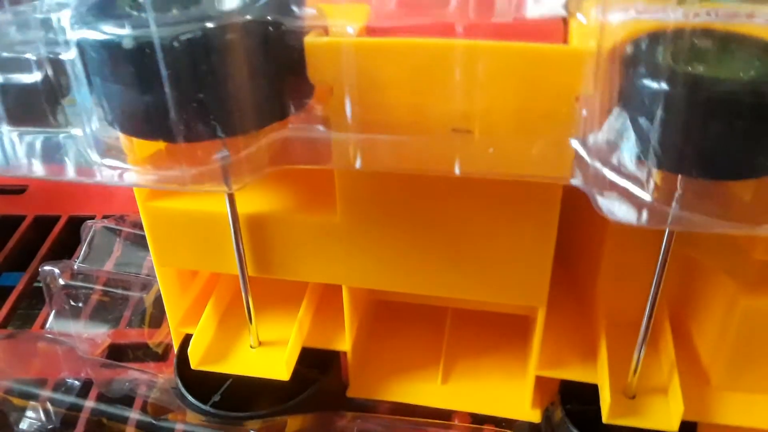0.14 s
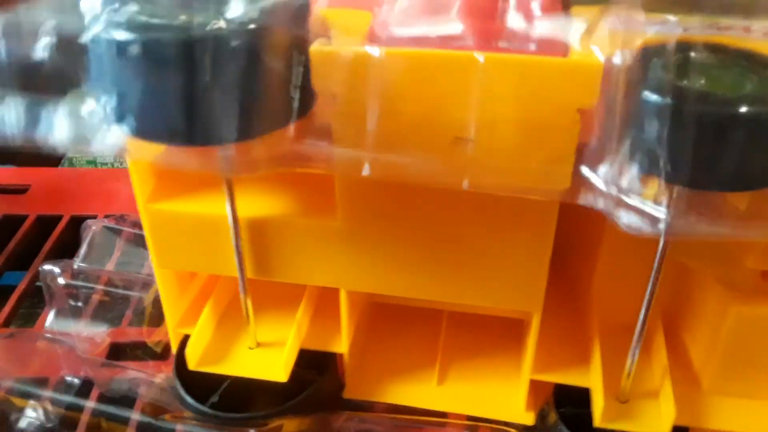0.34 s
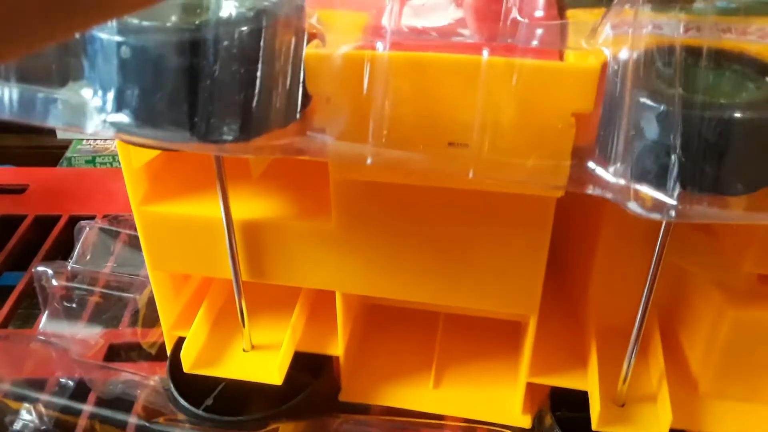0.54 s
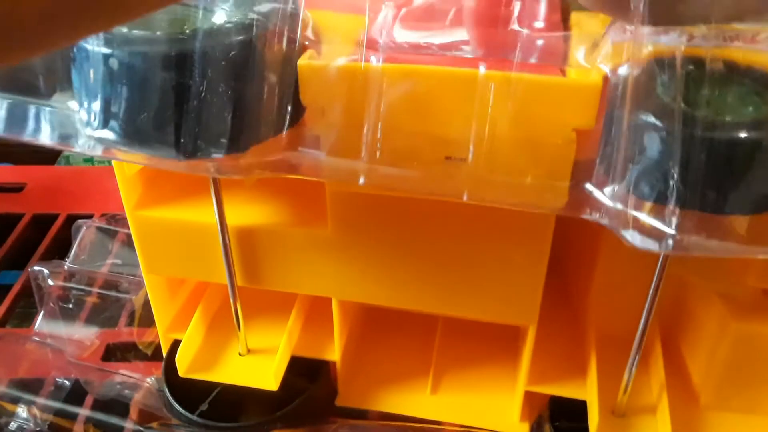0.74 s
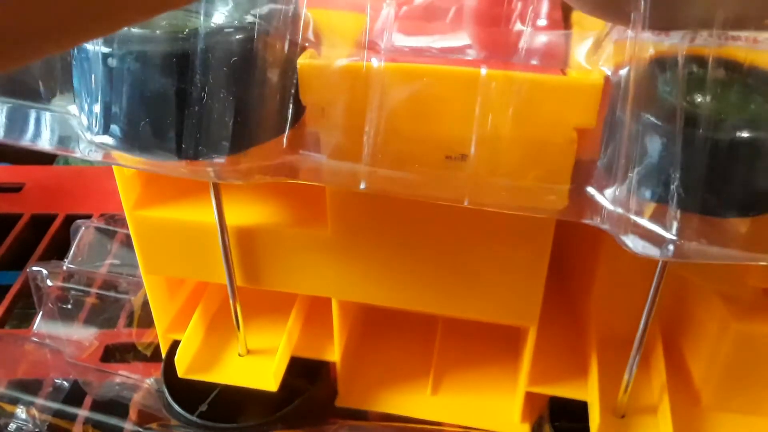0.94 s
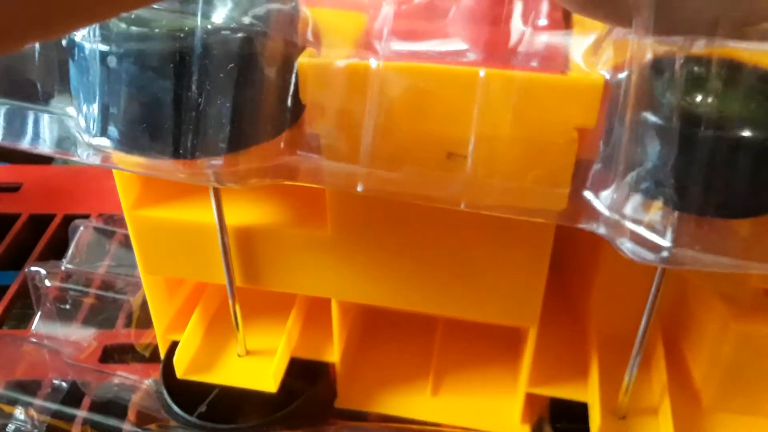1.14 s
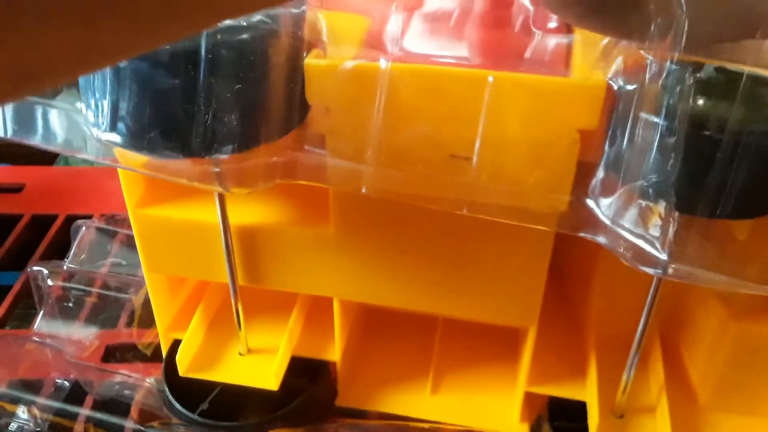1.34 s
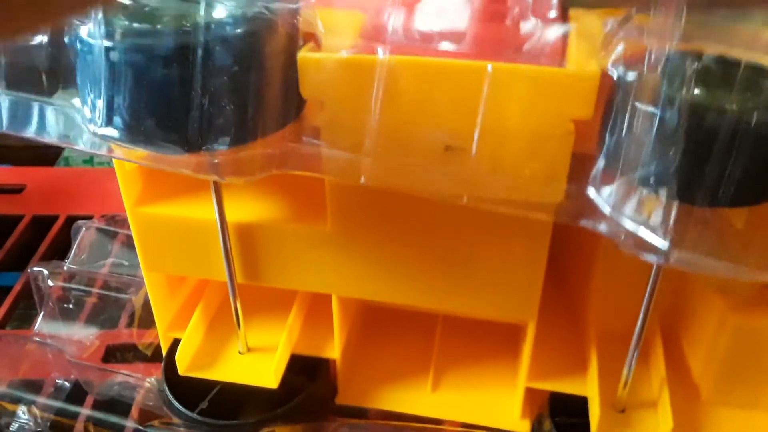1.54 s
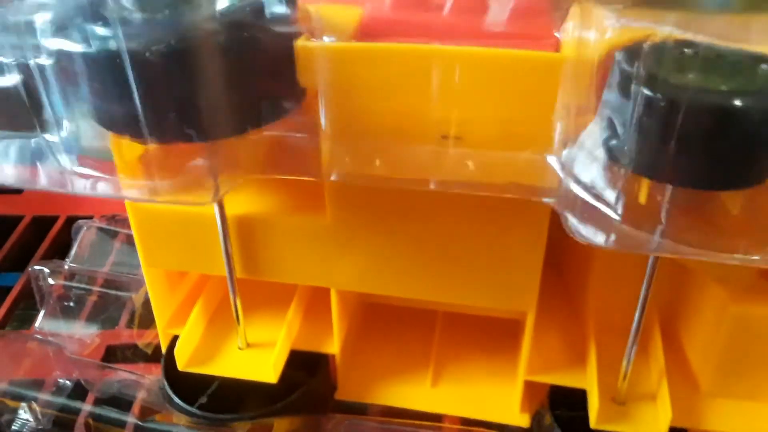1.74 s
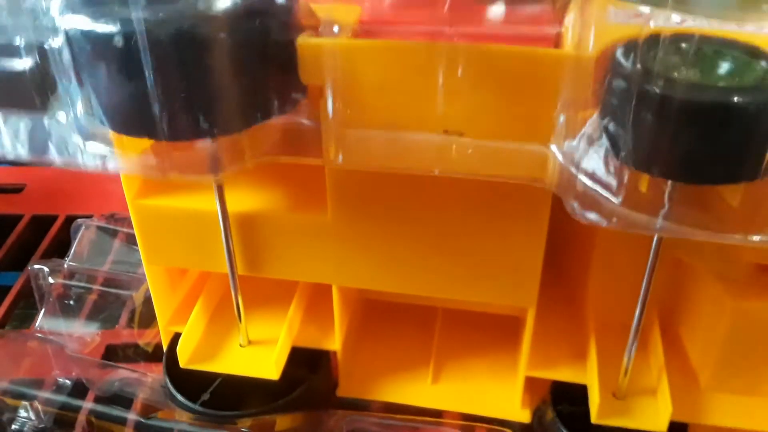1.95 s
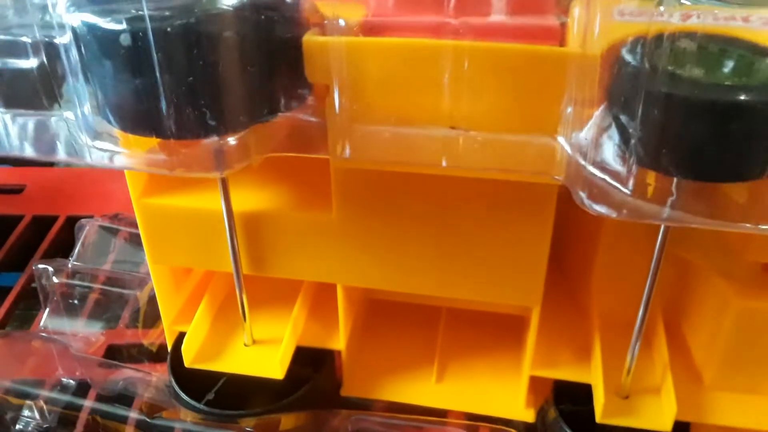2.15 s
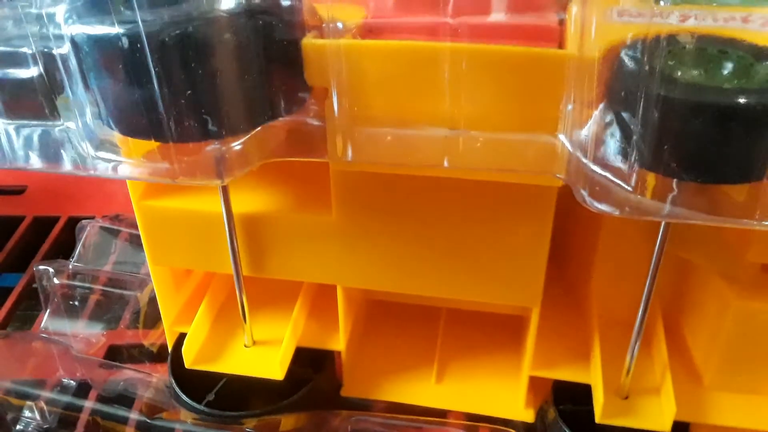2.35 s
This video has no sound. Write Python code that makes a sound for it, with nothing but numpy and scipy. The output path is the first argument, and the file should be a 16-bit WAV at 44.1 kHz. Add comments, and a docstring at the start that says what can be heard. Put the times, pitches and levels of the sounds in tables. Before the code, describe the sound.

Stiff plastic blister shell buckles with sharp clicks and crinkles, rubbing softly against a hard toy.

```python
"""A thin clear plastic blister buckles in bursts as it is pressed over a toy, close to two microphones in a small room.
Each snap sums a band-limited noise crack, a short facet ring, a lower shell ring and a low shake of the toy.
Tiny creases follow it, and noise tails return it from the nearby surroundings and the room.
Softer knocks use the same voices; rubbing is shaped noise plus a dense stream of stick-slip ticks.
Three low puffs of air, enveloped sines, push mostly at the right microphone."""
import sys
import numpy as np
from scipy import signal
from scipy.fft import rfft, irfft, next_fast_len
from scipy.io import wavfile

SR = 44100
rng = np.random.default_rng(int(sys.argv[2]) if len(sys.argv) > 2 else 0)


def transcribe(u):
    """Save the signal u as a 16-bit wav file named by the first command-line argument.

    u: samples, shape (n,) or (channels, n), limited to [-1, 1]; the rate is SR.
    q: integer samples, one column per channel.
    """
    v = np.clip(np.atleast_2d(u).T, -1, 1)
    q = np.round(v * 32767).astype(np.int16)
    wavfile.write(sys.argv[1], SR, q)


N = 105840  # length [samples]


def amp(db):
    """Decibels to gain."""
    return 10 ** (np.asarray(db) / 20)


def unit(x):
    """Scale to rms 1."""
    return x / np.sqrt(np.mean(x ** 2) + 1e-20)


def blow(x):
    """Scale a short sound to the energy of rms 1 held for 10 ms, averaged over its rows."""
    blow_s = 0.01
    energy = np.sum(x ** 2, axis=-1).mean()
    return x * np.sqrt(blow_s * SR / (energy + 1e-20))


def along(points, hz):
    """Interpolate (frequency [Hz], value) points on a log frequency axis."""
    f, v = np.transpose(points)
    return np.interp(np.log(hz + 1), np.log(f + 1), v)


def add(track, s, sound):
    """Mix a sound into the track at time s."""
    i = max(0, round(s * SR))
    track[:, i:i + sound.shape[1]] += sound[:, :N - i]


def filtered(x, response):
    """Multiply the spectrum of x by a response of frequency."""
    m = next_fast_len(N + 8192)
    hz = np.fft.rfftfreq(m, 1 / SR)
    return irfft(rfft(x, m) * response(hz), m)[..., :N]


def coloured(x, points, size=2048):
    """Minimum-phase filter with the gain of (frequency [Hz], level [dB]) points, by folding the cepstrum."""
    gain = amp(along(points, np.fft.rfftfreq(size, 1 / SR)))
    cepstrum = irfft(np.log(gain))
    cepstrum[1:size // 2] *= 2
    cepstrum[size // 2 + 1:] = 0
    impulse = irfft(np.exp(rfft(cepstrum)))
    return signal.fftconvolve(x, impulse[None], axes=1)[:, :N]


def pair(count, alike):
    """Left and right noise; alike is the shared part of the power."""
    noise = rng.standard_normal((3, count))
    return np.sqrt(alike) * noise[0] + np.sqrt(1 - alike) * noise[1:]


def left_later(x, lag_s):
    """Delay the left side by whole samples: the source sits to the right."""
    i = np.arange(x.shape[1])
    left = np.interp(i - round(lag_s * SR), i, x[0], left=0)
    return np.array([left, x[1]])


def snaps():
    """Snaps and knocks arrive directly, set off small creases, and scatter back from the surroundings."""
    # Facets giving way, levels as in blow(), before the overall colour:
    # (time [s], facet ring time [s], shell pitch [Hz], shell level [dB],
    #  facet pitch [Hz], facet level [dB], crack level [dB])
    snap_events = [(0.1431, 0.0024, 673, -35.5, 1920, -36, -46.5),
                   (0.2132, 0.0051, 485, -30, 2375, -32.5, -45),
                   (0.2259, 0.0023, 665, -47.5, 1540, -39.5, -30.5),
                   (0.2808, 0.0025, 732, -33.5, 1980, -26, -33),
                   (0.349, 0.0078, 1110, -23.5, 1840, -26.5, -38),
                   (0.3617, 0.0018, 764, -20, 2260, -21, -21.5),
                   (0.3635, 0.0022, 1105, -29, 2164, -13, -18.5),
                   (0.3701, 0.0038, 1230, -22.5, 3420, -23, -29),
                   (0.3779, 0.0013, 320, -25.5, 1440, -26.5, -16),
                   (0.3859, 0.0014, 950, -25.5, 4000, -26, -34),
                   (0.3877, 0.0029, 1770, -21, 4610, -17, -16), (0.395, 0.0053, 400, -28.5, 1700, -19, -24),
                   (0.4021, 0.012, 1390, -27, 3620, -23, -17),
                   (0.4212, 0.0062, 836, -31.5, 2380, -26, -25.5),
                   (0.452, 0.0011, 910, -30.5, 3520, -22, -23), (0.479, 0.0015, 1597, -30, 3400, -26, -16),
                   (0.6364, 0.0016, 1790, -43, 4060, -33.5, -28),
                   (0.7254, 0.0016, 2704, -33, 3560, -26.5, -23.5),
                   (0.9961, 0.0025, 940, -36, 1930, -32, -43.5),
                   (1.008, 0.0012, 1017, -32.5, 2040, -33.0, -47),
                   (1.0924, 0.0015, 1580, -26.5, 4190, -31, -25),
                   (1.1455, 0.0023, 1270, -24.5, 1600, -17.5, -43),
                   (1.1612, 0.00065, 835, -31, 2600, -28.5, -51),
                   (1.1693, 0.0014, 820, -38, 3480, -29, -29),
                   (1.1985, 0.0013, 704, -18.5, 2160, -18, -27.5),
                   (1.2281, 0.0023, 1043, -18, 2020, -15.5, -17),
                   (1.2555, 0.0043, 910, -28.5, 1370, -42, -39),
                   (1.2903, 0.00092, 1240, -27, 2820, -24, -20), (1.2999, 0.003, 850, -33, 3730, -27, -21),
                   (1.3461, 0.0043, 1160, -30.5, 1920, -36, -39), (1.388, 0.0016, 980, -31, 1930, -26, -35),
                   (1.3887, 0.0012, 1750, -42, 3530, -25.5, -21),
                   (1.429, 0.00095, 343, -38, 2220, -28, -33.5),
                   (1.4994, 0.0067, 260, -35.5, 1520, -28, -39),
                   (1.5092, 0.0039, 1680, -22, 3450, -26, -27),
                   (1.5564, 0.00077, 540.0, -62, 4200, -64, -28.5),
                   (1.6103, 0.0022, 990, -24, 1830, -16.5, -25), (1.6182, 0.0036, 822, -23, 1700, -24, -21),
                   (1.6266, 0.0016, 690, -24.5, 1390, -20, -18.5),
                   (1.631, 0.0013, 726, -25, 1390, -26, -46),
                   (1.6566, 0.0048, 1036, -23.5, 2300, -25.5, -20),
                   (1.68, 0.0023, 980, -28, 2300, -17, -22.5),
                   (1.684, 0.0029, 706, -19.5, 2620, -15.5, -33),
                   (1.733, 0.0022, 873, -19.5, 2050, -18, -40),
                   (1.7409, 0.0012, 902, -22.5, 1530, -23.5, -61),
                   (1.8516, 0.0082, 690, -36.5, 1654, -25, -38),
                   (1.8824, 0.0014, 486, -30, 1780, -31, -39.5), (1.8975, 0.0039, 523, -30, 1100, -35, -44),
                   (2.06, 0.0018, 1740, -30.5, 4120, -21, -13.5),
                   (2.062, 0.0018, 873, -18.5, 2687, -15, -40),
                   (2.2768, 0.0028, 677, -44.5, 2210, -45, -63), (2.3238, 0.0029, 690, -40, 1900, -41, -55)]
    # Soft bumps of the shell on the toy: (time [s], shell pitch [Hz], shell level [dB])
    knock_events = [(0.002, 335, -39.5), (0.2074, 920, -27.5), (0.6577, 555, -38.5), (0.6784, 665, -35.5),
                    (0.761, 360, -40.5), (1.217, 810, -28), (1.341, 1130, -29), (1.78, 730, -41),
                    (1.811, 776, -38), (1.9234, 337, -37.5), (1.985, 1200, -43), (2.356, 632, -42)]
    # Where the shell gives way, ahead, then right, then ahead: (time [s], lag of the left microphone [s])
    place = [(0.72, 0.000019), (0.95, 0.00021), (1.7, .0002), (2.05, 0.000078)]
    # Overall colour of the snaps: (frequency [Hz], level [dB])
    snap_colour = [(30, -18), (110, -3.5), (450, 3), (1200, 1.5), (2500, -0.5), (3100, -2), (3900, 0.5),
                   (5800, -6), (8200, -4), (10000, -12.5), (13000, -12), (16000, -19.5)]
    # Packaging and table around it: (frequency [Hz], time to fall 60 dB [s])
    near_decay = [(150, 0.19), (700, 0.14), (12000, 0.09)]
    # Room: (frequency [Hz], time to fall 60 dB [s])
    room_decay = [(150, 0.15), (1800, 0.27), (5000, 0.26), (15000, 0.25)]
    knock_ring_s, overtone = 0.0032, 5.3  # overtone: multiple of the shell pitch
    overtone_db, knock_crack_db = -13, -25.5  # relative to the shell
    near_db, room_db = -14, -12.5
    lag_spread_s = 0.00003  # every facet lies in its own place
    scattered_tone = 0.2  # main modes radiate mostly forwards: the scattered sound keeps this share of them

    knocks = [(s, knock_ring_s, hz, db, overtone * hz, db + overtone_db, db + knock_crack_db)
              for s, hz, db in knock_events]
    out = np.zeros((2, N))
    for s, *snap in snap_events + knocks:
        modes = snap[1:-1]  # shell and facet pitches and levels
        lag_s = np.interp(s, *np.transpose(place)) + lag_spread_s * rng.standard_normal()
        add(out, s, left_later(buckle(*snap), lag_s))
        add(out, s, left_later(creases(*modes), lag_s))
        near_tail = echoes(near_decay, alike=1.0, build_s=0.0005, size=4096)
        near = signal.fftconvolve(buckle(*snap, scattered_tone), near_tail, axes=1)
        room_tail = echoes(room_decay, alike=0.63, build_s=0.0046, size=14000)
        room = signal.fftconvolve(buckle(*snap, scattered_tone), room_tail, axes=1)
        add(out, s, amp(near_db) * near)
        add(out, s, amp(room_db) * room)
    return coloured(out, snap_colour)


def buckle(ring_s, shell_hz, shell_db, facet_hz, facet_db, crack_db, tone=1):
    """One facet cracks and rings, and shakes the shell and the toy."""
    shell_tone, facet_tone = 0.44, 0.59  # energy shares of the main mode, scaled by tone
    # a longer buckle also keeps the shell ringing
    shell_ring_s = 0.003 + 0.63 * ring_s
    shell = amp(shell_db) * ring(shell_hz, tone * shell_tone, shell_ring_s, alike=0.97)

    # the further the shell rings above the toy, the less it shakes it
    toy_band_hz, toy_ring_s = (180, 316), 0.011
    octaves_above = np.log2(shell_hz / toy_band_hz[1])
    toy_db = shell_db - 11 - 2.5 * octaves_above
    toy = amp(toy_db) * dense_modes(toy_band_hz, toy_ring_s, alike=0.96)

    facet = amp(facet_db) * ring(facet_hz, tone * facet_tone, ring_s, alike=0.09)
    facet = facet * amp([[1.5], [-1.5]])  # leans left
    crack = amp(crack_db) * dense_modes((4000, 14700), ring_s, alike=0.13)
    crack = crack * amp([[-1.2], [1.2]])  # leans right
    return shell + toy + facet + crack


def ring(hz, tone, ring_s, alike, size=3000):
    """One main mode, a decaying sine, stands out of the dense modes around it."""
    t = np.arange(size) / SR
    main = blow(np.sin(2 * np.pi * hz * t) * fade(ring_s, size))
    dense = dense_modes(hz * np.array([0.63, 1.74]), ring_s, alike)
    return blow(np.sqrt(tone) * main + np.sqrt(1 - tone) * dense)


def dense_modes(band_hz, ring_s, alike, size=3000):
    """Many overlapping modes struck at once, as fading noise through a band-pass."""
    b, a = signal.butter(2, band_hz, 'band', fs=SR)
    return blow(signal.lfilter(b, a, pair(size, alike) * fade(ring_s, size)))


def fade(ring_s, size):
    """A quick build-up, over a share of the ring time, into an exponential decay."""
    rise_share = 0.12
    u = np.arange(size) / SR / ring_s
    return (1 - np.exp(-u / rise_share)) * np.exp(-u)


def creases(shell_hz, shell_db, facet_hz, facet_db, count=7, size=6000):
    """A snap unloads its neighbours: a few tiny, quickly damped ticks follow it."""
    level_db, mean_wait_s = -19.5, 0.013  # level under the snap's modes
    pitch_spread, decay_s = 0.35, 0.00043  # log pitch spread; decay of the facet part
    wait = rng.gamma(2, mean_wait_s / 2, (count, 1))
    t = np.maximum(np.arange(size) / SR - wait, 0)
    out = np.zeros(size)
    for hz, db, tau in ((shell_hz, shell_db, 2 * decay_s), (facet_hz, facet_db, decay_s)):
        pitch = hz * np.exp(pitch_spread * rng.standard_normal((count, 1)))
        ticks = np.sin(2 * np.pi * pitch * t) * t / tau * np.exp(-2 * t / tau)
        out += amp(db + level_db) * blow(ticks).sum(axis=0)
    return np.array([out, out])


def echoes(t60s, alike, build_s, size):
    """A fresh stereo noise tail that builds up and dies by frequency, with left-side energy 1."""
    hz, t, z = signal.stft(pair(size, alike), SR, nperseg=256)
    decay = amp(-60 * t / along(t60s, hz)[:, None])
    tail = signal.istft(z * decay, SR, nperseg=256)[1][:, :size]
    tail = tail * (1 - np.exp(-(np.arange(size) / SR / build_s) ** 2))
    return tail / np.linalg.norm(tail[0])


def rubbing():
    """Plastic slides on the toy: a soft noise rustle with tiny stick-slip ticks."""
    # Rubbing strength, before the rustle and tick gains: (time [s], level [dB])
    rub_strength = [(0, -33), (0.098, -46.5), (.2, -39.5), (0.321, -34), (0.552, -35), (0.619, -48.5),
                    (0.7, -40.5), (0.811, -48), (.94, -51.5), (1.05, -43), (1.12, -49), (1.27, -42.5),
                    (1.46, -46.5), (1.722, -35), (1.91, -34), (1.954, -42), (2.1, -34), (2.232, -62.5),
                    (2.321, -45.5), (2.4, -49.5)]
    # Relative spectrum of the rustle: (frequency [Hz], level [dB])
    rustle_colour = [(50, -21.5), (95, 0), (250, -6), (800, -1), (1600, -8), (4200, -13.5), (5600, -26.5),
                     (16000, -35)]
    rustle_db, tick_db = -5, -6
    level_db = np.interp(np.arange(N) / SR, *np.transpose(rub_strength))
    rustle = unit(coloured(pair(N, alike=0.6), rustle_colour))
    return amp(level_db) * (amp(rustle_db) * rustle + amp(tick_db) * slips())


def slips(size=2000):
    """Stick-slip ticks: each rings a different patch of the shell for a few cycles."""
    ticks_per_s, typical_hz, pitch_spread = 260, 640, 0.86  # spread of log pitch
    swell_cycles = 0.93  # cycles to the top of a tick's swell
    step_db, max_steps = 7, 2.5  # random extra level, in exponentially spread steps up to a cap
    out, t = np.zeros((1, N)), np.arange(size) / SR
    for when, pitch, strength in rng.random((int(ticks_per_s * N / SR), 3)):
        hz = typical_hz * np.exp(pitch_spread * np.arcsin(2 * pitch - 1))
        cycles = t * hz
        tick = np.sin(2 * np.pi * cycles) * cycles * np.exp(-cycles / swell_cycles)
        extra_db = step_db * min(-np.log(1 - strength), max_steps)
        add(out, when * N / SR, amp(extra_db) * tick[None])
    return unit(out)


def puffs():
    """Air pushed out by the shell: a short low push, mostly on the right microphone."""
    # Puffs: (time [s], envelope peak level on the right [dB])
    puff_events = [(0.3864, -17.5), (0.48, -36.5), (2.056, -30)]
    puff_hz, peak_s, left_db = 98.4, 0.0045, -17  # left_db: relative to the right
    out, t = np.zeros((2, N)), np.arange(SR // 10) / SR
    swell = (t / peak_s) ** 2 * np.exp(2 - 2 * t / peak_s)
    push = -np.sin(2 * np.pi * puff_hz * t) * swell
    for s, db in puff_events:
        add(out, s, amp([[db + left_db], [db]]) * push)
    return out


def scene():
    """Snaps, rubbing and puffs; the rubbing lies a little to the right, so the left hears it later."""
    rub_lag_s = 0.00014
    return snaps() + left_later(rubbing(), rub_lag_s) + puffs()


def record(dry):
    """A steep low-pass leaves almost nothing above the band limit."""
    top_hz = 16300
    return filtered(dry, lambda hz: 1 / (1 + (hz / top_hz) ** 120))


dry = scene()
out = record(dry)
transcribe(out)
```